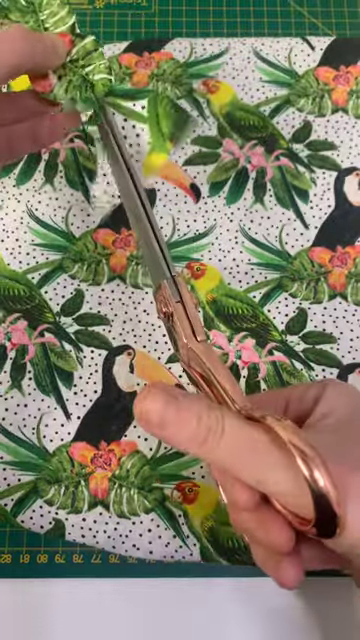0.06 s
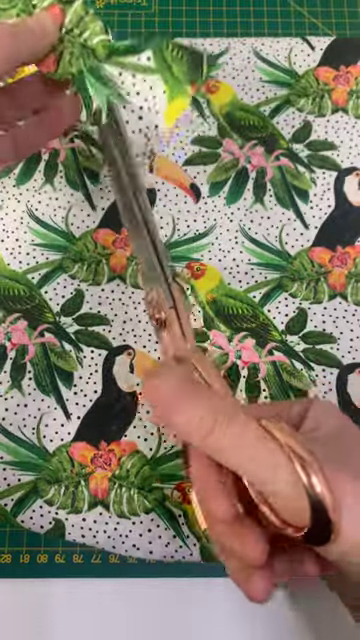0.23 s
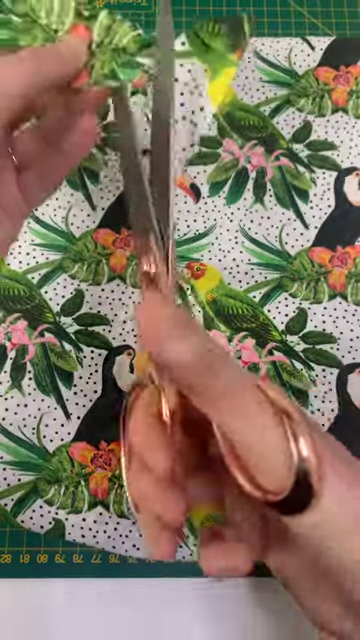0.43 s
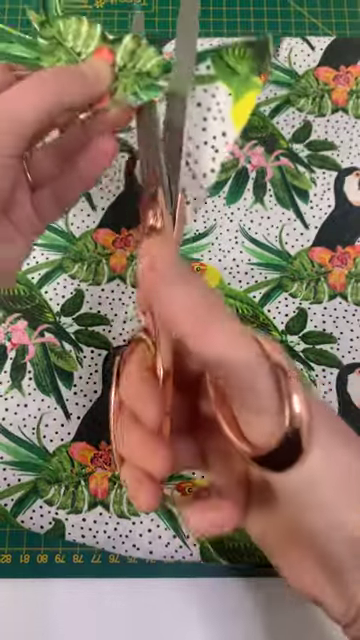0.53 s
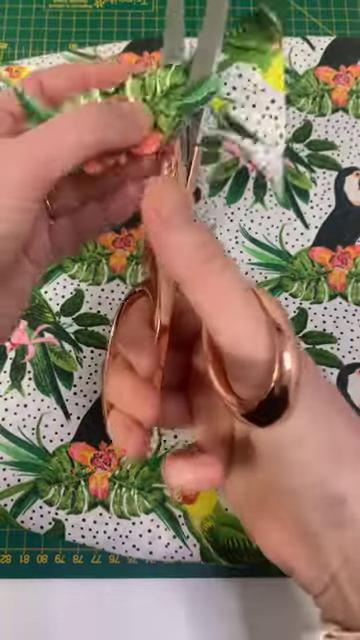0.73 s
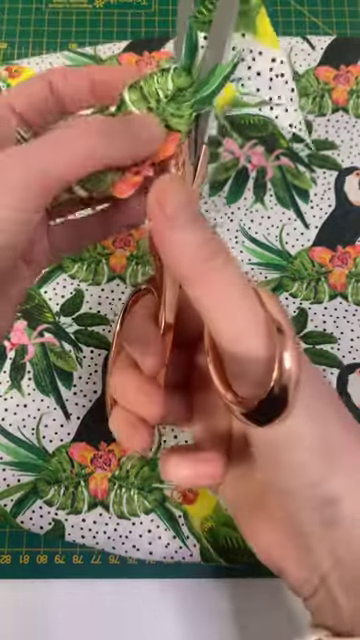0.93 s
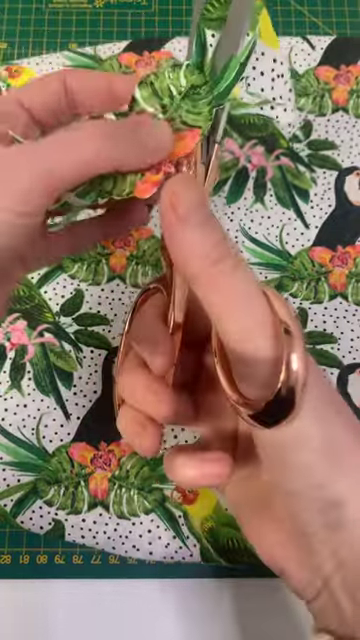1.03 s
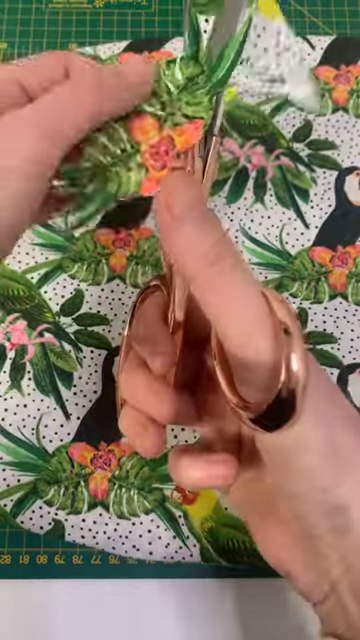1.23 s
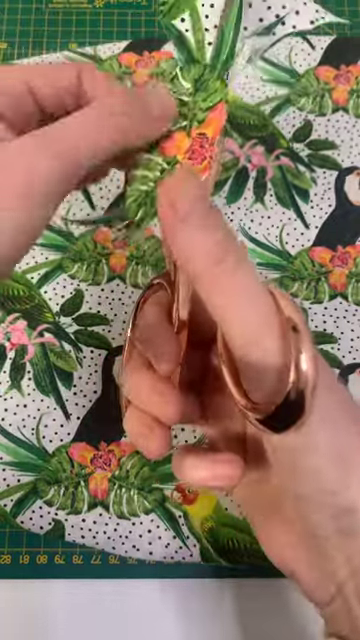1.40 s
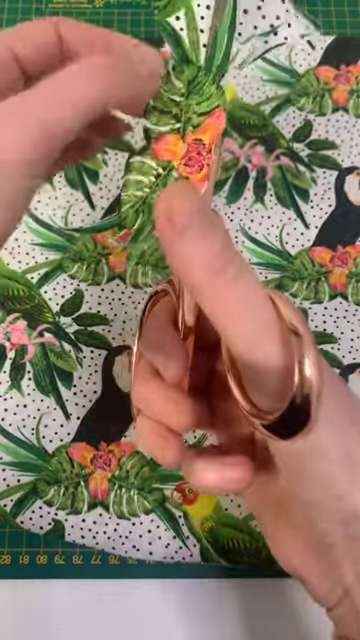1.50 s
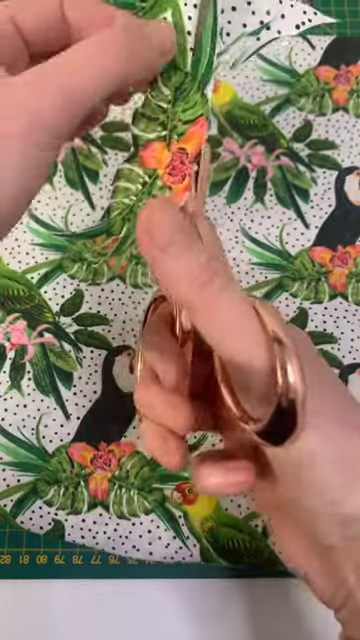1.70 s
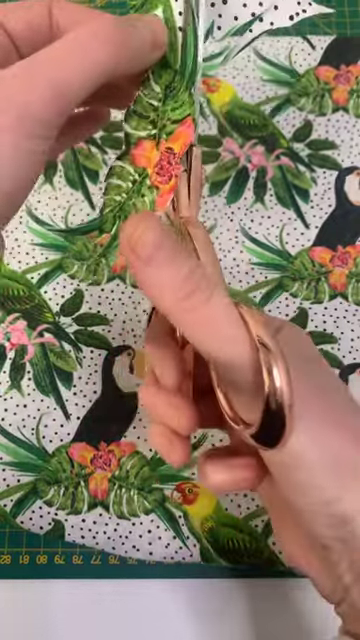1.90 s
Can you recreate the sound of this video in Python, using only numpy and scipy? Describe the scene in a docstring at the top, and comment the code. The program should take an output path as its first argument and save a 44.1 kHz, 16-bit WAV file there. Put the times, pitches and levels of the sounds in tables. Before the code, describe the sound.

Close up in a quiet room, scissors snip fabric once with a crisp metallic snap. A soft, squeaky scrape follows as they reopen, then much quieter nibbling cuts, cloth rustles and light ticks.

```python
"""Steel scissors close to a phone in a quiet room. The blades shear cloth, its fibres slipping in clumps.
At 0.09 s they snap shut: contacts ring the steel, the handles thump, the room rings. The hand's push
rumbles until 0.2 s. At 0.25 s the blades scrape open, steel squeaking on steel. From 0.44 s: small quiet
nibbles and rustles in the cloth, with soft knocks, ticks and squeaks, over steady room tone."""
import sys
import numpy as np
from scipy import signal
from scipy.fft import rfft, irfft, next_fast_len
from scipy.io import wavfile
from scipy.ndimage import map_coordinates

SR = 44100
rng = np.random.default_rng(int(sys.argv[2]) if len(sys.argv) > 2 else 0)


def int16_out(signal):
    """Quantize to a 16-bit WAV file."""
    q = np.round(np.clip(np.atleast_2d(signal).T, -1, 1) * 32767)
    wavfile.write(sys.argv[1], SR, q.astype(np.int16))


N = 85995

# Closing blade contacts, the last a weak echo off the table: (time [s], peak [dB])
CONTACTS = [(.0901, -3.5), (.0909, -6.5), (.0933, -19)]
# Struck blade resonances: (centre [Hz], width [Hz], gain [dB])
BLADE_MODES = [(718.4, 120, -18.5), (1325, 231, -14.5), (2044, 190, -8.5), (3264, 160, -14),
               (3960, 390, -18), (4850, 150, -9), (5802, 190, -4.5), (6930, 320, -4.5), (9250, 440, 2),
               (10300, 320, -3), (10930, 704, -5), (12500, 730, -1), (13250, 820, -5.5),
               (14760, 900, -14.5)]
# Snap spectrum toward the walls, over the blade resonances: (frequency [Hz], gain [dB])
WALL_SPECTRUM = [(150, -29.5), (500, -4.5), (1250, 3.5), (2100, 3.5), (3600, 5.5), (7000, 0), (10400, -1),
                 (13500, -2.5), (15800, 8)]

# Cut before the snap: (time [s], level [dB])
SHEAR_ENVELOPE = [(0, -50.5), (.016, -59.5), (.021, -43), (.025, -33.5), (.031, -38.5), (.04, -41.5),
                  (.046, -44), (.051, -41.5), (.056, -45.5), (.062, -44), (.068, -56.5), (.081, -53.5),
                  (.089, -30.5)]
# Opening scrape: (time [s], level [dB], treble re level [dB])
OPEN_ENVELOPE = [(0.254, -67, -8), (0.263, -53.5, 0.5), (0.292, -54.5, -3.5), (0.304, -59.5, -3.5),
                 (0.356, -70.5, -17.5), (0.37, -83, -19)]
# One list per small cut or rustle: (time [s], level [dB], treble re level [dB], low mids re level [dB])
NIBBLE_ENVELOPES = [
    [(0.44, -78.5, -10, 7.5), (0.488, -90, 2, 5), (0.496, -74, -15.5, -15), (0.528, -82.5, -8, 9.5),
     (0.579, -80, -9, -3)],
    [(0.579, -73, 1, 1), (0.585, -62.5, -0.5, -4), (0.661, -64, -15, -2.5), (0.673, -57.5, -10, -3),
     (0.69, -70.5, 2, 5)],
    [(0.69, -66.5, -10, -2), (0.768, -65.5, -16.5, -0.5), (0.802, -59, -10, -3), (0.82, -72, -4, 4),
     (0.87, -88, -12, 4)],
    [(0.93, -83, -6, -1.5), (0.974, -68, -11, 1.5), (1.058, -69.5, -7, -1.5), (1.106, -86, -3, 9)],
    [(1.12, -85, -6, 11), (1.14, -77, -1, -16), (1.144, -73.5, -4.5, 0), (1.164, -77.5, -12, -9),
     (1.19, -94.5, -8.5, 17)],
    [(1.215, -91, -15, 2), (1.227, -69.5, -10, 2), (1.245, -78.5, -5.5, -11), (1.251, -66, -26, 0),
     (1.27, -88, -16, 13)],
    [(1.27, -70.5, -13, -4.5), (1.308, -65.5, -19, -3), (1.368, -74.5, -15, 1.5),
     (1.386, -80.5, -16.5, -15), (1.4, -101, -9.5, 11)],
    [(1.424, -86, -9, -10), (1.431, -58, -28, -20), (1.444, -61.5, -9.5, -9.5), (1.538, -81.5, -0.5, -3),
     (1.56, -104, -8, 12.5)],
    [(1.66, -87.5, -15, -8.5), (1.7, -71, -11, -1), (1.728, -88, -13, -3), (1.78, -72.5, -3, -1.5),
     (1.81, -99, -18, 2)],
    [(1.912, -95, -1.5, 12), (1.932, -79.5, -7, -1), (1.94, -78, -6, -6.5), (1.95, -68.5, -6, -20)],
]
# Friction spectra: (frequency [Hz], gain [dB])
SHEAR_SPECTRUM = [(150, -40), (250, -8), (627, -7.5), (1150, -4.5), (2190, -12.5), (5300, -3),
                  (11800, -10.5), (15800, -15.5)]
OPEN_SPECTRUM = [(240, -59), (400, -19.5), (1120, -16), (4270, -18), (6180, -5.5), (7550, -10.5),
                 (14000, -17.5), (15800, -17)]
NIBBLE_SPECTRUM = [(120, -27), (200, 7.5), (401, -7.5), (610, -2.5), (1930, -8.5), (3100, -7.5),
                   (4080, -11), (5370, -5), (15800, -14.5)]
# Steel resonances under friction: (centre [Hz], width [Hz], gain [dB])
SHEAR_MODES = [(7000, 28, 0), (8000, 62, 1), (8730, 44, 1.5), (9700, 500, -9.5), (12700, 40, -5),
               (15120, 150, -5.5)]
OPEN_MODES = [(2357, 180, -1), (4960, 270, 0), (6446, 470, -4), (8570, 460, 0), (11600, 300, -1),
              (13740, 300, 0)]
NIBBLE_MODES = [(2640, 230, -4.5), (5300, 500, -3.5), (7000, 540, -8), (8300, 740, 1), (14200, 540, 8)]

# Steel squeaks: (time [s], length [s], start pitch [Hz], end pitch [Hz], level [dB])
SQUEAKS = [(0, 0.089, 1880, 1770, -52.5), (.259, 0.011, 9200, 8700, -56.5),
           (0.266, .011, 13750, 13400, -50), (.284, 0.01, 6725, 6300, -49),
           (0.296, 0.032, 11320, 8000, -60), (0.299, 0.015, 9600, 9580, -55), (0.32, .026, 9510, 9800, -70),
           (0.324, 0.034, 6640, 6000, -62.5), (0.495, 0.077, 5510, 5400, -79),
           (0.586, .01, 13500, 13400, -62), (0.613, 0.022, 5200, 5260, -64),
           (0.663, 0.014, 5590, 4970, -56.5), (1.034, 0.024, 10900, 11100, -76),
           (1.314, .018, 7140, 6700, -60), (1.289, 0.055, 701, 702, -69.5), (1.471, 0.018, 2880, 2685, -67),
           (1.467, 0.039, 5030, 5960, -70)]
# Knocks and ticks: (time [s], relative level [dB], pitch [Hz], T60 [s])
TICKS = [(0.084, -45, 4770, 0.0038), (0.089, -33, 5900, 0.0015), (.397, -50, 648, 0.0047),
         (.582, -53, 690, 0.0063), (0.9795, -43, 776, 0.0078), (1.0527, -51.5, 4500, 0.0043),
         (1.052, -57, 1966, 0.0072), (1.227, -54.5, 6000, 0.00075), (1.253, -58, 4930, 0.0013),
         (1.53, -49, 6420, 0.00053), (1.747, -56, 8800, 0.0026), (1.834, -61, 12000, .0012),
         (1.932, -58.5, 8950, .002)]
# Hand squeezing, handles settling: (time [s], level [dB])
RUMBLE_ENVELOPE = [(0, -55.5), (.045, -62), (.07, -67.5), (.12, -60), (.18, -64), (.21, -84)]
# Room decay: (frequency [Hz], T60 [s])
ROOM_DECAY = [(200, 0.56), (1000, 0.43), (3000, 0.35), (8000, 0.35), (15000, 0.28)]
# Room tone and hiss: (frequency [Hz], gain [dB])
ROOM_TONE_SPECTRUM = [(12, -47.5), (20, 4.5), (167, -5.5), (268, -10.5), (308, -11.5), (469, -12),
                      (713, -17), (1080, -19), (2240, -22.5), (2570, -23.5), (5620, -28), (15800, -40)]

NOISE_LIMIT_HZ = 15850


def amp(db):
    return 10 ** (np.asarray(db) / 20)


def unit_rms(x):
    return x / np.sqrt(np.mean(x ** 2) + 1e-20)


def log_interp(table, hz):
    """Table value at hz, on a log frequency axis."""
    points_hz, values = np.transpose(table)
    return np.interp(np.log(hz + 1), np.log(points_hz + 1), values)


def envelopes_db(table):
    """Per-sample curve for each column after time; -120 dB outside."""
    times_s, *columns = np.transpose(table)
    return [np.interp(np.arange(N) / SR, times_s, column, -120, -120) for column in columns]


def filtered(x, response):
    """Apply the complex gain response(hz) by padded FFT."""
    size = next_fast_len(N + SR // 2)
    return irfft(rfft(x, size) * response(np.fft.rfftfreq(size, 1 / SR)), size)[..., :N]


def resonances(modes, hz):
    """Complex response of damped modes, alternating in sign."""
    return sum((-1) ** k * amp(db) * 1j * hz * width_hz / (centre_hz ** 2 - hz ** 2 + 1j * hz * width_hz)
               for k, (centre_hz, width_hz, db) in enumerate(modes))


def band(x, lo_hz, hi_hz):
    """Soft-edged band at RMS 1."""
    def response(hz):
        return (hz < NOISE_LIMIT_HZ) / (1 + (lo_hz / (hz + 1)) ** 6) / (1 + (hz / hi_hz) ** 6)
    return unit_rms(filtered(x, response))


def friction(spectrum, modes, ring_db, grain_db, clump_hz):
    """Slips in uneven clumps, through a broad spectrum and the steel's resonances; RMS 1."""
    def response(hz):
        ring = 1 + amp(ring_db) * abs(resonances(modes, hz))
        return amp(log_interp(spectrum, hz)) * ring * (hz < NOISE_LIMIT_HZ)
    clumps = map_coordinates(rng.standard_normal(N // 10), [np.arange(N) * clump_hz / SR])
    slips = rng.standard_normal(N) * amp(grain_db * clumps)
    return unit_rms(filtered(slips, response))


def snap():
    """Sharp contacts ring the damped blades."""
    blows = np.zeros(N)
    for time_s, db in CONTACTS:
        blows[round(time_s * SR)] = amp(db)
    ring = filtered(signal.unit_impulse(N), lambda hz: resonances(BLADE_MODES, hz))
    return signal.fftconvolve(blows, ring / abs(ring).max())[:N]


def snap_to_walls():
    """Click radiated from all sides of the blades, coloured by their resonances; unit energy."""
    def response(hz):
        return amp(log_interp(WALL_SPECTRUM, hz)) * abs(resonances(BLADE_MODES, hz)) ** 0.62
    click = filtered(signal.unit_impulse(N, round(CONTACTS[0][0] * SR)), response)
    return click / np.linalg.norm(click)


def handle_thump(lag_s=0.0034, start_hz=234, end_hz=52, fall_hz_per_s=12000, t60_s=0.12):
    """The first contact thumps the handles: a damped, falling sine."""
    t = np.maximum(np.arange(N) / SR - CONTACTS[0][0] - lag_s, 0)
    pitch_hz = np.maximum(start_hz - fall_hz_per_s * t, end_hz) * (t > 0)
    return amp(-45.5 - 60 * t / t60_s) * np.sin(2 * np.pi * np.cumsum(pitch_hz) / SR)


def shear():
    """Cloth fibres slip and part between the closing blades."""
    rub = friction(SHEAR_SPECTRUM, SHEAR_MODES, ring_db=7.0, grain_db=4.5, clump_hz=500)
    return amp(envelopes_db(SHEAR_ENVELOPE)[0]) * rub


def opening_scrape():
    """Blade rubs blade; the treble fades first."""
    level_db, treble_db = envelopes_db(OPEN_ENVELOPE)
    rub = friction(OPEN_SPECTRUM, OPEN_MODES, ring_db=-2.5, grain_db=2.0, clump_hz=620)
    return amp(level_db) * (band(rub, 500, 8000) + amp(treble_db) * band(rub, 8000, 30000))


def nibbles():
    """Small cuts and rustles in cloth, each with its own swell and brightness."""
    rub = friction(NIBBLE_SPECTRUM, NIBBLE_MODES, ring_db=-7.0, grain_db=2.0, clump_hz=400)
    low, mid, treble = band(rub, 200, 4200), band(rub, 4200, 9500), band(rub, 9500, 30000)
    return sum(amp(level_db) * (mid + amp(treble_db) * treble + amp(low_db) * low)
               for level_db, treble_db, low_db in map(envelopes_db, NIBBLE_ENVELOPES))


def squeaks(width_hz=650):
    """Steel on steel: gliding tones, roughened into narrow noise bands."""
    out, t = np.zeros(N + SR), np.arange(SR // 10) / SR
    for time_s, length_s, start_hz, end_hz, db in SQUEAKS:
        progress = np.clip(t / length_s, 0, 1)
        swell = np.sqrt(abs(np.sin(np.pi * progress))) * (progress < 1)
        phase = 2 * np.pi * np.cumsum(start_hz + (end_hz - start_hz) * progress) / SR
        noise_i, noise_q = [map_coordinates(row, [t * width_hz]) for row in rng.standard_normal((2, 200))]
        tone = noise_i * np.cos(phase) + noise_q * np.sin(phase)
        out[round(time_s * SR):][:len(t)] += amp(db) * swell * tone
    return out[:N]


def ticks(gain_db=7.0):
    """Knocks and ticks: damped sines with a soft attack."""
    out, t = np.zeros(N + SR), np.arange(SR // 20) / SR
    for time_s, db, hz, t60_s in TICKS:
        attack = 1 - np.exp(-8 * t / t60_s)
        decay = 2 * amp(db + gain_db - 60 * t / t60_s)
        out[round(time_s * SR):][:len(t)] += attack * decay * np.sin(2 * np.pi * hz * t)
    return out[:N]


def hand_rumble():
    """Unsteady push of the hand through handles and table."""
    return amp(envelopes_db(RUMBLE_ENVELOPE)[0]) * band(rng.standard_normal(N), lo_hz=35, hi_hz=126)


def reverb(x, predelay_s=0.003, gain_db=-9):
    """Room reflections: a noise tail whose highs die first."""
    hz, t, noise = signal.stft(rng.standard_normal(SR // 2), SR, nperseg=256)
    decay = amp(-60 * t / log_interp(ROOM_DECAY, hz)[:, None])
    tail = signal.istft(noise * decay, SR, nperseg=256)[1]
    delayed = np.pad(x, (round(predelay_s * SR), 0))
    wet = signal.fftconvolve(delayed, tail / np.linalg.norm(tail))[:N]
    return amp(gain_db) * filtered(wet, lambda hz: hz < NOISE_LIMIT_HZ)


def room_tone(level_db=-66):
    """Steady room noise and microphone hiss."""
    def response(hz):
        return amp(log_interp(ROOM_TONE_SPECTRUM, hz)) * (hz < NOISE_LIMIT_HZ)
    return amp(level_db) * unit_rms(filtered(rng.standard_normal(N), response))


def scene():
    """Mono mix: direct sound, reflections, background."""
    impact = snap() + handle_thump()
    rubs_and_ticks = shear() + opening_scrape() + nibbles() + squeaks() + ticks()
    reflections = reverb(amp(-14) * impact + amp(2.5) * snap_to_walls())
    reflections += amp(-5) * reverb(rubs_and_ticks)
    return (impact + rubs_and_ticks + reflections + room_tone() + hand_rumble())[None]


def record(dry, limit_hz=16800, rolloff_hz=700):
    """The phone's band limit."""
    return filtered(dry, lambda hz: np.clip((limit_hz - hz) / rolloff_hz, 0, 1) ** 2)


dry = scene()
out = record(dry)
int16_out(out)
```